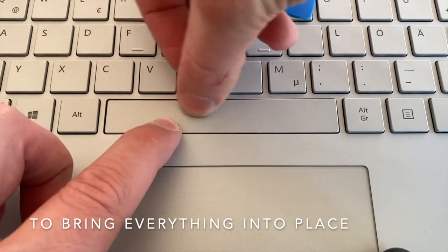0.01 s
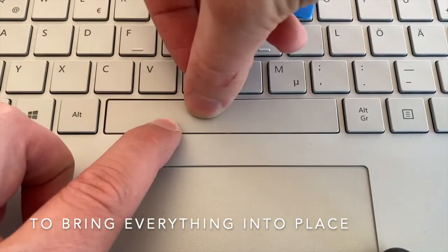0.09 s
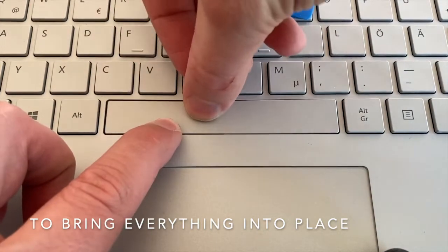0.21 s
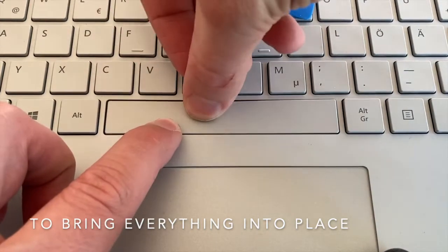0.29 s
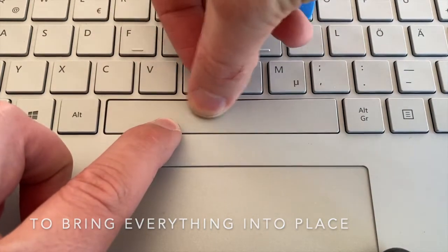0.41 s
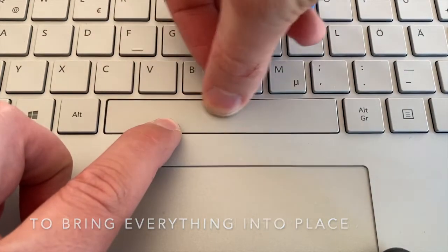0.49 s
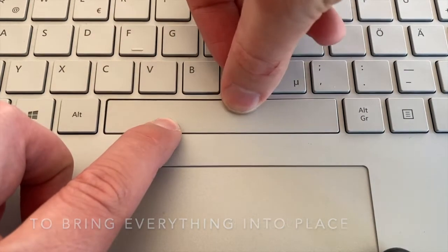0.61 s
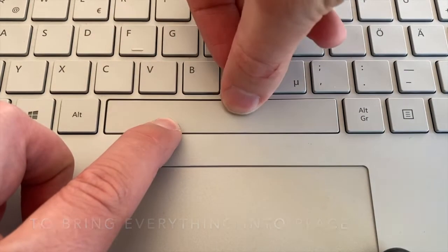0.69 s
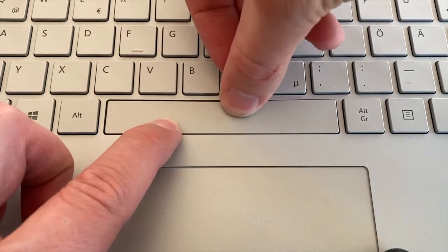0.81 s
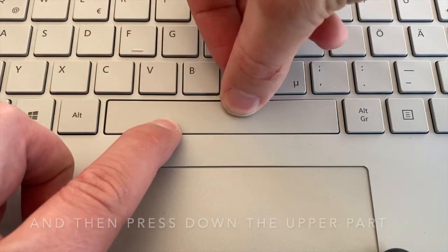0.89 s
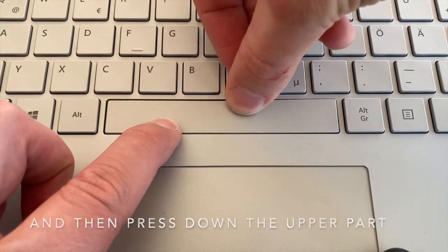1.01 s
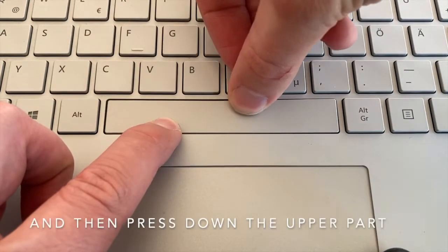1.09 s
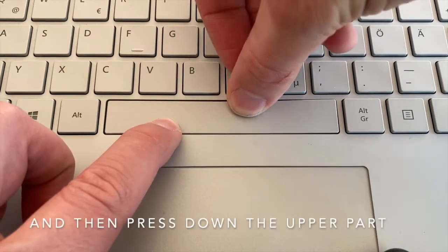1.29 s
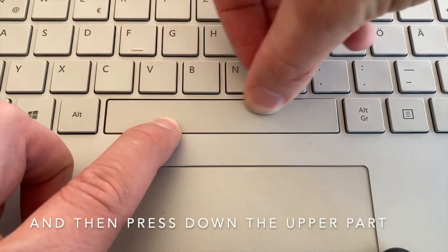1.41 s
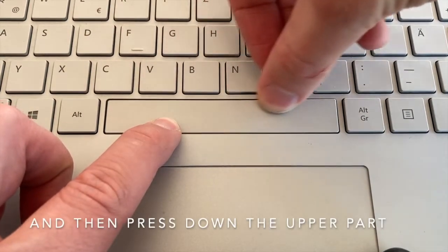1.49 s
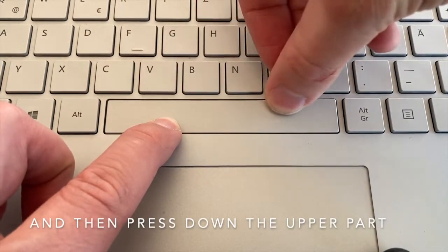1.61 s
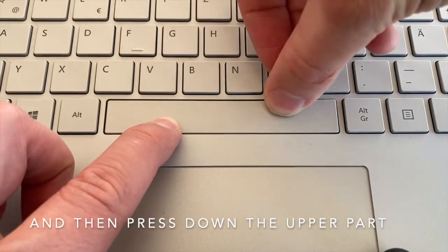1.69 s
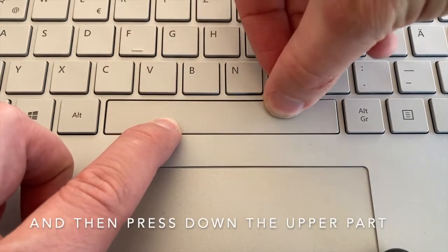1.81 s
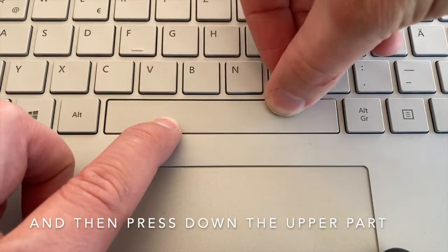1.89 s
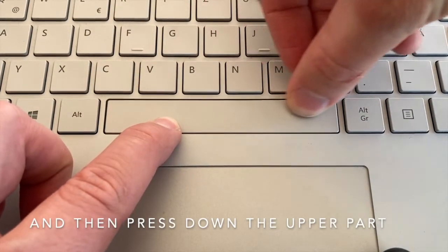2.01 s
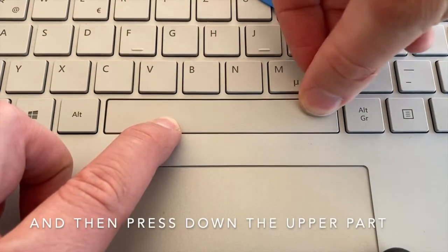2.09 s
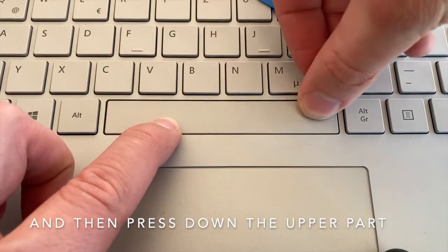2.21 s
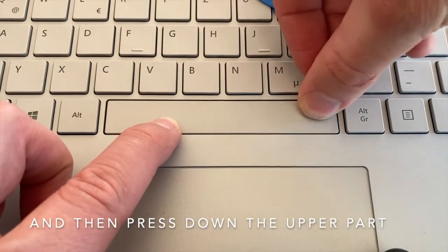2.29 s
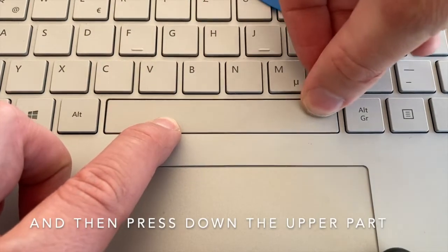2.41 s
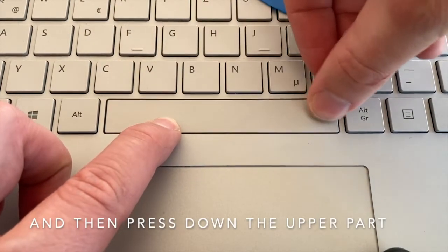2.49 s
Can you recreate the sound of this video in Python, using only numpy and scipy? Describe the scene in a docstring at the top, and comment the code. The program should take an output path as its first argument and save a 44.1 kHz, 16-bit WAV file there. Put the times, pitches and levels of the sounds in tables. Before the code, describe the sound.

Sharp plastic key clicks on a laptop pressed by thumb, with faint ticks and slides, quiet room

```python
"""A desk in a quiet room, with a laptop close to a microphone that has two ports.
A thumb presses a loose space bar back into its clips: each snap is a sharp plastic crack of ringing modes,
with a thud of case and desk made of low modes. Between snaps the thumb touches down with small knocking
ticks and slides along the key with a soft hiss of shaped noise. A low rumble of hands on the desk, the room's
diffuse tail and a steady hiss lie behind."""
import sys
import numpy as np
from scipy import signal
from scipy.fft import rfft, irfft
from scipy.io import wavfile

SR = 44100
rng = np.random.default_rng(int(sys.argv[2]) if len(sys.argv) > 2 else 0)


def generate_wav(sig):
    """Save sig (samples, or channels by samples) to the path in sys.argv[1] as 16-bit PCM at SR."""
    pcm = np.round(np.clip(np.atleast_2d(sig).T, -1, 1) * 32767).astype(np.int16)
    wavfile.write(sys.argv[1], SR, pcm)


def undo_db(level):
    """Turn decibels back into plain size, where 20 dB means ten times bigger."""
    steps = np.asarray(level, float) / 20
    return 10 ** steps


N = 110250

# clips snapping in: (time [s])
SNAP_TIMES = [.2338, 1.1727, 1.6869, 2.1343, 2.1399, 2.2077]
# the same snaps: (level [dB], bright ring [Hz], knock [Hz], low modes [dB], middle modes [dB], thud [dB])
SNAPS = [(-9, 10600, 2400, -3.5, -4, -40.5), (-12.5, 12000, 3100, -7, -1, -46.5),
         (-11.5, 8600, 2386, -4.5, 1.5, -44), (-28, 12000, 2840, 2, 13.5, -63.5),
         (-8.5, 12000, 3600, -31, -10, -61), (-7.5, 9600, 2400, -5, -8.5, -44)]
# thumb touches and small ticks: (time [s])
TICK_TIMES = [.392, .4995, .8285, .982, 1.331, 1.654, 1.891]
# the same ticks: (level [dB], pitch [Hz], treble [dB], thud [dB])
TICKS = [(-52, 1500, 12.5, -61.5), (-44.5, 900, -12, -58.5), (-52, 1130, 21.5, -56), (-51, 1100, 4, -47),
         (-50, 910, 14.5, -51), (-60, 1600, -14, -54), (-58.5, 700, 17, -58)]
# modes of the key cap: (frequency [Hz], level [dB], t60 [s])
CAP_MODES = [(973, -14, 0.012), (1296, -9.5, 0.0088), (1832, -7.5, 0.0049), (2223, -7, 0.0037),
             (3110, -7, 0.0031), (3150, -1, 0.0046), (4640, 0.5, 0.0063), (5460, -8, .004),
             (6200, -7, 0.0066), (7510, 0, 0.0021), (10370, 2, 0.001), (12400, 0, 0.00083),
             (15300, -4, .0025)]
# modes of case and desk: (frequency [Hz], level [dB], t60 [s], delay [s])
DESK_MODES = [(52, -8, .25, .022), (69, 0, .2, .012), (100, -8, .2, .008), (150, 4, .08, .003),
              (205, -9, .25, .012), (243, -4, .18, .01), (330, 3, .045, .001), (420, -9, .12, .004),
              (520, -11, .12, .001)]
# thumb slides: (start [s], end [s])
SLIDE_TIMES = [(-.1, .05), (.393, .556), (.83, .885), (.983, 1.025), (1.332, 1.515), (1.892, 2.048),
               (2.42, 2.462)]
# the same slides: (level at the start [dB], change by the end [dB])
SLIDES = [(-64.5, -4.5), (-59, -5), (-74, -11), (-66.5, -9), (-58.5, -5), (-60, 2), (-68, -2)]
# colour of skin on plastic: (frequency [Hz], relative density [dB per Hz])
SKIN = [(290, -12), (500, -16), (7380, -5), (9060, 2), (9740, -11.5), (11800, 2.5), (13600, -5.5),
        (15600, -13.5), (16500, -27)]
# low rumble of hands on the desk: (time [s], level [dB])
RUMBLE_LEVEL = [(0.0, -66.5), (0.41, -64.5), (0.54, -72), (0.76, -65), (0.95, -64), (1.09, -61.5),
                (1.2, -55), (1.5, -67), (1.7, -63), (1.84, -82), (1.93, -65), (2.5, -70.5)]
# colour of the rumble: (frequency [Hz], relative density [dB per Hz])
RUMBLE_COLOUR = [(15, -32), (25, -2), (128, 2.5), (204, -27), (240, -4.5), (277, -23), (321, -18.5),
                 (600, -46), (780, -84.5), (1320, -120)]
# colour of room and microphone hiss: (frequency [Hz], relative density [dB per Hz])
HISS = [(240, -42.5), (400, -6.5), (800, -9), (1600, -14), (4000, -14.5), (8000, -17.5), (12000, -19),
        (16500, -21)]
# likeness of left and right in diffuse sound: (frequency [Hz], correlation [-1 to 1])
LIKENESS = [(60, .93), (130, .88), (290, .55), (640, .2), (1500, 0), (15000, 0)]
# the room's tail: (frequency [Hz], level [dB], t60 [s])
ROOM = [(35, -51, .4), (99, -22, 1), (300, -21, 0.34), (740, -40.5, 0.56), (2360, -29, 0.44),
        (6360, -33.5, 0.44), (11000, -40.5, .35), (16000, -50, 0.37)]
# reflections off near surfaces: (delay [s], level [dB])
ECHOES = [(0.0103, -25), (0.015, -21.5)]
# the two microphone ports: (frequency [Hz], left minus right [dB], phase turn of the left [rad])
PORTS = [(150, 0, 0), (500, 4, 1.4), (1000, 6, 2.6), (2000, 5, 4), (3500, 1, 3.8), (7000, 0, 3.6)]

RATTLE_S, RATTLE_DB, RATTLE_LOSS_DB = .0022, -3, 14  # length, level at its start, fall over its length
RING_DB, RING_T60_S = 6, .0032
KNOCK_DB, KNOCK_T60_S = -4, .006
LOW_MODES_BELOW_HZ, MID_MODES_BELOW_HZ = 1600, 5000
MODE_SPREAD_DB, PORT_SPREAD_DB = 2., 6  # chance from mode to mode, and between left and right
SOFT_DB_PER_OCTAVE = -6  # thuds of ticks only
LIFT_S = .0076  # time constant of the fade as the thumb lifts
HISS_DB = -80.5
GRAIN_DB = 1.5  # flicker of the room's tail
LEFT_LAG_S = 10 / 44100
ECHO_CUT_HZ = 10000  # echoes are at half height here
TOP_HZ = 16200


def snaps():
    """A hard contact and a rattle of weaker ones ring the cap; returns both sides and the bare contacts."""
    out, bare = np.zeros((2, N)), np.zeros(N)
    first = unit_click(2048)
    for s, (db, ring_hz, knock_hz, low_db, mid_db, _) in zip(SNAP_TIMES, SNAPS):
        # the hard contact comes at 0, at 0 dB; the others at chance shares of the rattle's length
        when = np.r_[0, rng.random(15)]
        heights = undo_db((RATTLE_DB - RATTLE_LOSS_DB * when) * (when > 0)) * rng.choice([-1, 1], 16)
        clicks = np.zeros(2048)
        np.add.at(clicks, (when * RATTLE_S * SR).astype(int), heights)
        clicks /= np.sqrt(np.sum(clicks ** 2))

        bright = undo_db(RING_DB) * ring(first, ring_hz, RING_T60_S)
        knock = undo_db(KNOCK_DB + mid_db) * ring(first, knock_hz, KNOCK_T60_S)
        body = (bright + knock) * np.ones((2, 1))
        for k, (hz, mode_db, t60) in enumerate(CAP_MODES):
            level = mode_db + MODE_SPREAD_DB * rng.normal()
            if hz < LOW_MODES_BELOW_HZ:
                level += low_db
            elif hz < MID_MODES_BELOW_HZ:
                level += mid_db
            if hz < MID_MODES_BELOW_HZ:
                level = level + PORT_SPREAD_DB * rng.normal() * np.array([[.5], [-.5]])
            body += (-1) ** k * ring(clicks, hz, t60) * undo_db(level)

        i = int(s * SR)
        out[:, i:i + 2048] += undo_db(db) * body
        # a short smear follows the level of the middle modes
        smear = (undo_db(mid_db / 2) - 1) * .4 * .6 ** np.arange(32)
        bare[i:i + 32] += undo_db(db) * (unit_click(32) + smear)
    return butter(out, 2, 600, "high"), bare


def ticks():
    """A thumb touch is a dry knock of two damped modes with a crisp edge of fast-fading noise."""
    out, t = np.zeros(N), np.arange(1024) / SR
    touch = unit_click(1024)
    for s, (db, hz, treble_db, _) in zip(TICK_TIMES, TICKS):
        edge = signal.lfilter([1, -.5], [1], rng.standard_normal(1024)) * np.exp(-t / .0011)
        knock = ring(touch, hz, .01) - .7 * ring(touch, 1.6 * hz, .006)
        i = int(s * SR)
        out[i:i + 1024] += undo_db(db) * (knock + undo_db(treble_db) * edge / 2)
    return butter(out, 2, 500, "high")


def thuds():
    """Every press rings the modes of case and desk, each after its own delay; soft touches favour the lows."""
    out = np.zeros(N)
    for hz, mode_db, t60, delay in DESK_MODES:
        soft_db = SOFT_DB_PER_OCTAVE * np.log2(hz / 64.3)
        clicks = np.zeros(N)
        for s, row in zip(SNAP_TIMES + TICK_TIMES, SNAPS + TICKS):
            level = row[-1] + mode_db + MODE_SPREAD_DB * rng.normal()
            if s in TICK_TIMES:
                level += soft_db
            clicks[int((s + delay) * SR)] = undo_db(level)
        out += ring(clicks, hz, t60)
    return butter(out, 2, [35, 700], "band")


def slides():
    """Skin drags over plastic: hiss that sets in within 4 ms, swells or sags, and fades on lift-off."""
    t, level = np.arange(N) / SR, 0
    for (start, end), (db, swell_db) in zip(SLIDE_TIMES, SLIDES):
        share = np.clip((t - start) / (end - start), 0, 1)
        onset = np.clip((t - start) / .004, 0, 1)
        lift = np.exp(-np.maximum(t - end, 0) / LIFT_S)
        level = level + undo_db(db + swell_db * share) * onset * lift
    return level * banded_noise(SKIN, patchy_db=2.0)


def ports(x):
    """The left port hears later, turned in phase, with fuller low mids; near surfaces echo."""
    hz = np.arange(1, N // 2 + 2) * SR / N
    tilt = undo_db(at_hz(PORTS, hz) / 2)
    turn = np.exp(1j * (at_hz(PORTS, hz, axis=2) - 2 * np.pi * hz * LEFT_LAG_S))
    late = sum(undo_db(db) * np.exp(-2j * np.pi * hz * s) for s, db in ECHOES)
    echoes = 1 + late / (1 + (hz / ECHO_CUT_HZ) ** 4)
    return irfft(rfft(x) * echoes * np.array([tilt * turn, 1 / tilt]), N)


def room(x):
    """A diffuse noise tail that dies band by band, alike on both sides only in the bass."""
    t, tail = np.arange(SR // 2) / SR, 0
    for hz, (mid, side) in bands(size=len(t)):
        decay_db = -60 * t / at_hz(ROOM, hz, axis=2)
        level = undo_db(at_hz(ROOM, hz) + GRAIN_DB * drift(60)[:len(t)] + decay_db)
        tail = tail + level * spread(mid, side, at_hz(LIKENESS, hz))
    return signal.fftconvolve(x[None], tail * np.clip(t / .004, 0, 1), axes=1)[:, :N]


def rumble():
    """Hands on the desk: patchy low noise whose level follows a table."""
    level = undo_db(np.interp(np.arange(N) / SR, *np.transpose(RUMBLE_LEVEL)))
    return level * banded_noise(RUMBLE_COLOUR, patchy_db=4.5)


def hiss():
    """Room and microphone hiss: noise at one mean level, with slight flicker in each band."""
    return undo_db(HISS_DB) * banded_noise(HISS, patchy_db=-1.46)


def banded_noise(spectrum, patchy_db):
    """Stereo noise with level, flicker and likeness per band; rms 1."""
    out = 0
    for hz, (mid, side) in bands(size=N):
        alike = np.clip(at_hz(LIKENESS, hz), -1, 1)
        level = undo_db(at_hz(spectrum, hz) + patchy_db * drift(10))
        out = out + level * spread(mid, side, alike)
    return rms_one(out)


def bands(size):
    """Half-octave bands of noise as (centre, mid and side); neighbours come from unrelated noises."""
    edges = 25 * 2 ** np.arange(0, 9.6, .5)
    white = rng.standard_normal((2, 2, size))
    for k, (low, high) in enumerate(zip(edges, edges[1:])):
        yield np.sqrt(low * high), butter(white[k % 2], 2, [low, high], "band")


def spread(mid, side, alike):
    """Mix mid and side noise into left and right with the given correlation."""
    return np.sqrt(1 + alike) * mid + np.sqrt(1 - alike) * side * [[1], [-1]]


def drift(rate):
    """Slow chance of spread 1: noise through two equal poles at rate [Hz]."""
    r = np.exp(-80 * np.pi * rate / SR)  # one step is 40 samples
    slow = signal.lfilter([1], [1, -2 * r, r * r], rng.standard_normal(N // 40 + 2002))[2000:]
    return np.interp(np.arange(N) / 40, np.arange(len(slow)), rms_one(slow))


def ring(clicks, hz, t60):
    """A damped resonance: a unit click sets a sine of about height 1 ringing."""
    r, w = undo_db(-60 / (t60 * SR)), 2 * np.pi * hz / SR
    return signal.lfilter([0, np.sin(w)], [1, -2 * r * np.cos(w), r * r], clicks + 1e-18)


def unit_click(size):
    """A single 1 followed by silence."""
    return 1. * (np.arange(size) == 0)


def butter(x, order, hz, kind):
    """Butterworth filter."""
    return signal.sosfilt(signal.butter(order, hz, kind, fs=SR, output="sos"), x)


def rms_one(x):
    """Scale to rms 1."""
    return x / np.sqrt(np.mean(x ** 2) + 1e-20)


def at_hz(points, hz, axis=1):
    """Read a column of a table on a log-frequency axis."""
    points = np.array(points)
    return np.interp(np.log(hz), np.log(points[:, 0]), points[:, axis])


def scene():
    """Snaps and ticks through the ports and the room, over thuds, slides, rumble and hiss."""
    cracks, bare = snaps()
    small = ticks()
    near = ports(cracks + small) + thuds() + slides()
    return near + room(bare + undo_db(-11.5) * small) + rumble() + hiss()


def band_limit(x):
    """A steep low-pass at the top of the band."""
    return signal.sosfilt(signal.butter(12, 17140, fs=SR, output="sos"), x)


def record(dry):
    """The top of the treble rolls off steeply."""
    dull = butter(dry, 10, TOP_HZ, "low")
    return band_limit(dull)


dry = scene()
out = record(dry)
generate_wav(out)
```